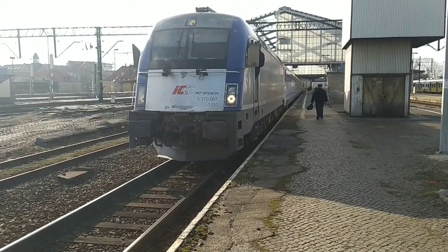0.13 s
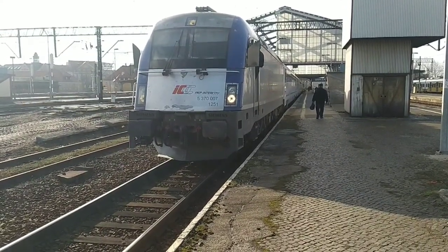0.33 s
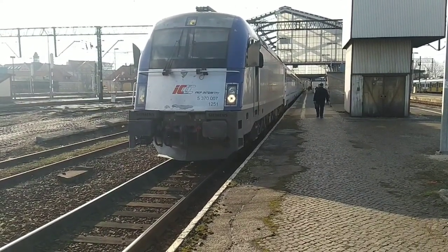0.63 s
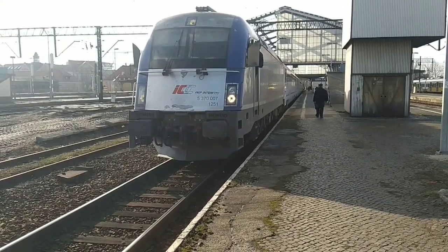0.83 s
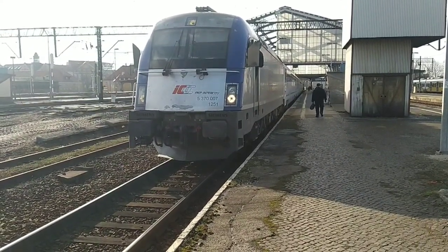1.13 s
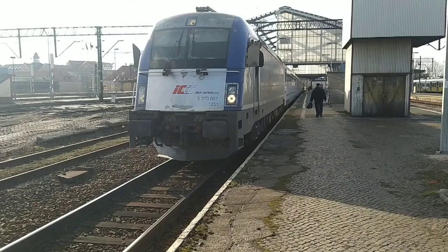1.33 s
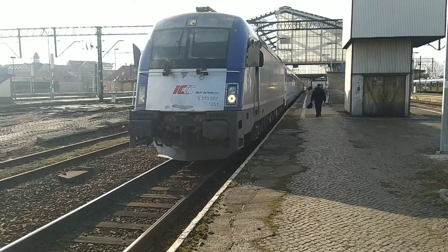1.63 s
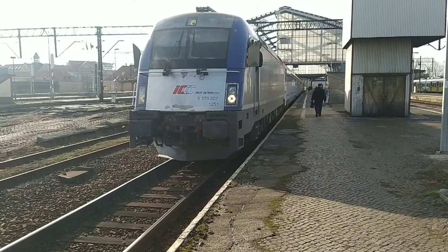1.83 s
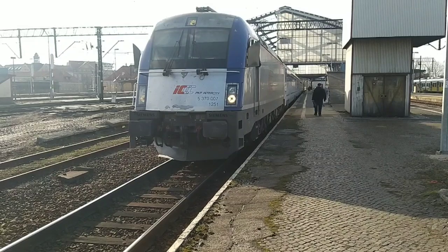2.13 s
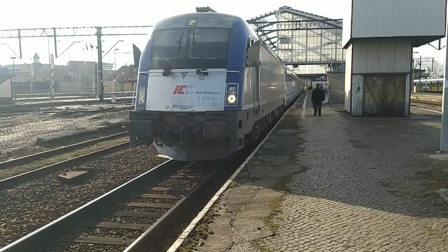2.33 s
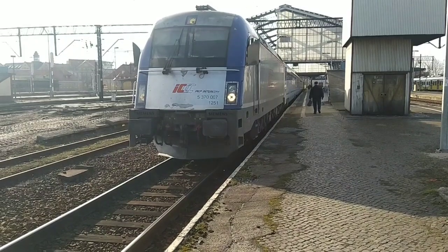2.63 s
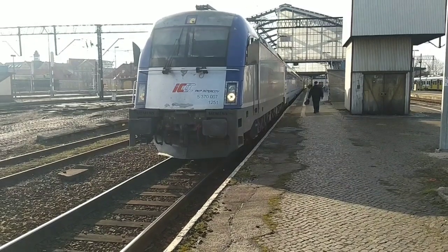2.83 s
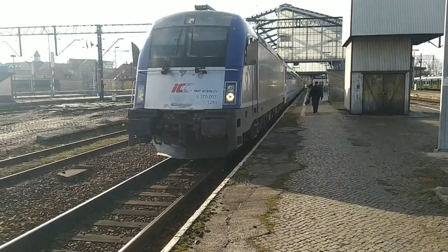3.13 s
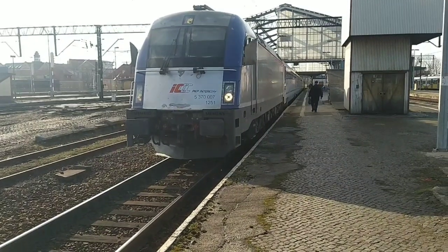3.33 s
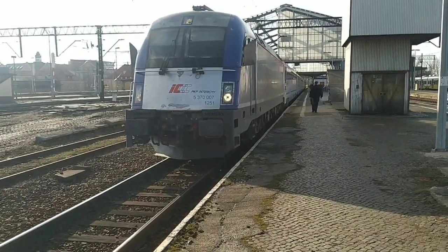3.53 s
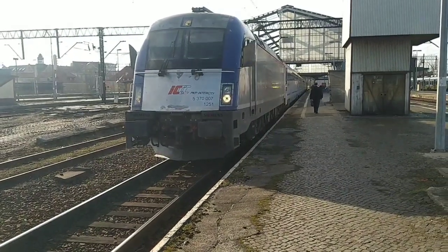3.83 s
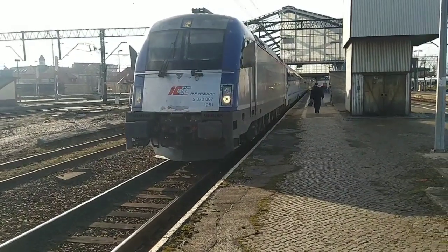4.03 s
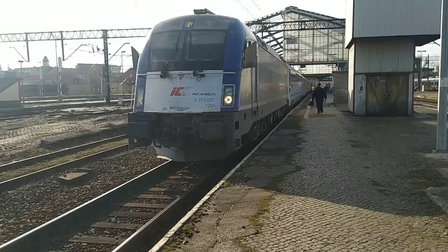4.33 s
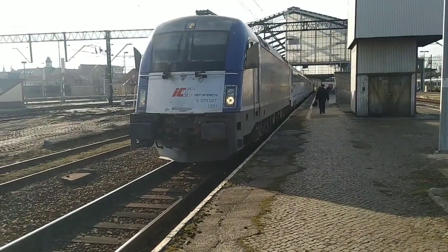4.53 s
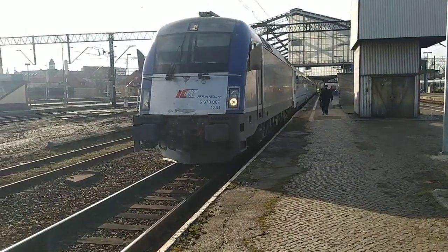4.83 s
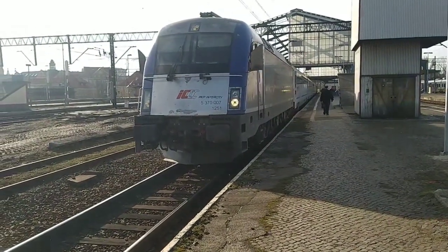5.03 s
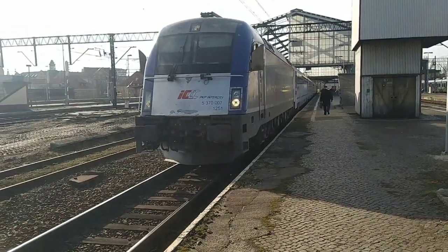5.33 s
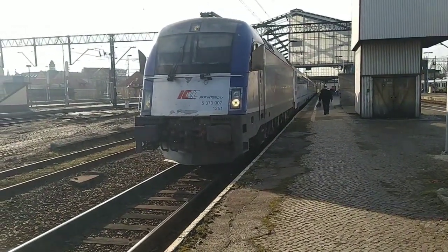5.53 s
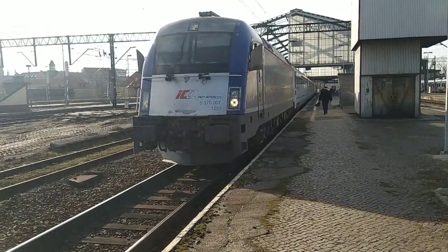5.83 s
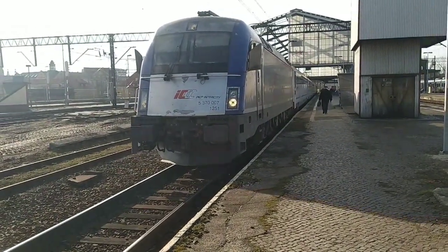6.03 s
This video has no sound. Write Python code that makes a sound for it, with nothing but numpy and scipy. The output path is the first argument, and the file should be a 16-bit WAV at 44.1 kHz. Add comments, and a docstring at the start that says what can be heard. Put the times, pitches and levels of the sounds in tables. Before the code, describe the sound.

An electric locomotive stands a few metres away at a station platform. Throughout, its cooling fan whines on one mid-pitched note, wavering gently in loudness over a hollow duct roar, rushing air and a low machinery rumble, with a faint high hiss behind. At about 1.8 seconds something rustles softly close by, and again around 3 seconds. From 3.4 seconds a faint lower fan tone comes up and the roar climbs slightly, while the whine gradually eases. Light gritty scuffs, like a shoe shifting on paving, come at about 3.6 and 4.6 seconds, with more rustling up to 5 seconds. Just after 5 seconds there is one small, bright, close snap, like grit cracking. The whine lifts barely in pitch near the end, and the machinery is still running at about 6 seconds.

```python
"""An electric locomotive stands at a platform a few metres away, about to pull out.
From the start its twelve-blade cooling fan whines on one note over duct roar, rushing air and rumble.
From 1.8 s something rustles close by, later with scuffs, like a shoe shifting on gritty paving.
At 3.4 s the machinery takes up load: a lower fan tone comes up and the duct roar climbs.
Just after 5 s comes one close snap, like grit cracking; at the end the whine lifts very slightly."""
import sys
import numpy as np
from scipy import signal
from scipy.fft import rfft, irfft
from scipy.io import wavfile

SR = 44100
rng = np.random.default_rng(int(sys.argv[2]) if len(sys.argv) > 2 else 0)


def generate_wav(signal):
    """Clip the signal to [-1, 1] and save it as 16-bit WAV at the path in sys.argv[1]."""
    frames = np.transpose(np.atleast_2d(signal))
    scaled = np.clip(frames, -1, 1) * 32767
    pcm = np.round(scaled).astype(np.int16)
    wavfile.write(sys.argv[1], SR, pcm)


N = 272538
TIME, FREQ = np.arange(N) / SR, np.fft.rfftfreq(N, 1 / SR)


# the whine's swell at the listener: (time [s], level before trim [dB], left minus right [dB])
WHINE_SWELL = [(0, -28.5, 0), (.22, -26.5, .5), (.36, -28.5, -0.5), (.7, -27.5, -1), (.93, -29.5, -3),
               (1.22, -28, 0), (1.4, -26, 1), (1.58, -29, -1), (1.78, -26.5, -.5), (1.87, -26, 2),
               (2.12, -25.5, 1), (2.22, -27, 0), (2.35, -26.5, 2), (2.62, -27.3, 2), (3.03, -25, 2),
               (3.4, -28, 6.5), (3.6, -24, 1.5), (3.74, -25.5, 0.5), (3.84, -26.5, 1.5), (3.89, -30, 0),
               (3.95, -25.5, 0), (4.07, -25.5, -2.5), (4.2, -27.5, -5), (4.3, -26, -1.5), (4.6, -28.5, -7),
               (4.84, -30.5, -10), (4.96, -29.5, -5.5), (5.07, -32, -2), (5.21, -28.5, 0),
               (5.38, -32.5, -7), (5.48, -29.5, -3.5), (5.56, -31.5, -7), (5.73, -31, -2), (5.8, -32, -3),
               (6.0, -33, 1), (6.1, -30, 7), (6.18, -32, 6)]
# its stereo image sways, then drifts toward the centre as the microphone turns:
# (time [s], right channel's phase lead [rad])
WHINE_LEAD = [(0, 1.14), (.38, .72), (.75, 1.1), (1.05, 0.63), (1.38, 1.2), (1.6, .55), (1.8, 1.05),
              (2.1, 0.79), (3.0, 0.92), (3.17, 0.85), (3.42, 1.03), (3.95, 0.52), (4.1, 0.53), (4.95, -0.1),
              (5.85, -.1), (6.0, -0.41), (6.18, 0.038)]

def blade_whine(phase, trim_db=1.94, scatter_db=-45, scatter_hz=18):
    """The blade-passing note: a wavering direct tone over its echo, scattered by the station."""
    swell_db, pan_db = curves(WHINE_SWELL)
    gain = undb(swell_db + trim_db + 0.3 * walk(12))
    direct = fan_tone(phase, rough=0.083, flutter_hz=16, lead=curves(WHINE_LEAD)[0])
    scatter = [walk(scatter_hz) * np.cos(phase) + walk(scatter_hz) * np.sin(phase) for _ in range(2)]
    return direct * gain * pan(pan_db) + undb(scatter_db) * np.array(scatter)


# the whine's pitch holds, then lifts a touch: (time [s], offset [Hz])
WHINE_BEND = [(0, .2), (2.1, .2), (2.5, 0), (5.55, 0), (5.8, .9)]
# weaker fan tones: (multiple of the shaft rate, level [dB], left minus right [dB])
SIDE_TONES = [(10, -58.5, 9), (11, -49, -8.5), (13, -45, 11.5), (24, -55, 1), (48, -59.5, 7)]

def cooling_fan(shaft_hz=58.955, blades=12, load_start_s=3.4, load_rise_s=0.28):
    """The blade whine leads; unequal blades add tones at other multiples of the shaft rate."""
    speed_hz = shaft_hz * (1 + 0.00015 * walk(1.64)) + curves(WHINE_BEND)[0] / blades
    shaft = 2 * np.pi * np.cumsum(speed_hz) / SR
    tones = blade_whine(blades * shaft)
    # the ninth multiple comes up under load
    ninth_db = np.interp(TIME, [load_start_s, load_start_s + load_rise_s], [-52, -45])
    tones += fan_tone(9 * shaft, rough=0.46, flutter_hz=7, lead=0.22) * undb(ninth_db)
    # nearly in quadrature with the whine, the side tones sway its phase more than its level
    for order, db, pan_db in SIDE_TONES:
        side = fan_tone(order * shaft + 1.4, rough=0.22, flutter_hz=7, lead=0.7)
        tones += side * undb(db) * pan(pan_db)
    return tones


def fan_tone(phase, rough, flutter_hz, lead):
    """A stereo tone, the right side lead radians ahead; intake eddies shake its level and phase."""
    def eddy():
        return walk(flutter_hz) + 1j * walk(flutter_hz)
    shared = eddy()
    flutter = np.array([unit(shared + 0.26 * eddy()) for _ in range(2)])
    carrier = np.exp(1j * (phase + lead * np.array([[0], [1]])))
    return unit(np.real((1 + rough * flutter) * carrier))


# the duct's resonant hump: (frequency [Hz], relative level [dB])
DUCT_COLOUR = [(560, -16.5), (660, -10.5), (750, -8.5), (810, -4.5), (870, -4), (925, -9.5), (1010, -20),
               (1200, -50)]
# the roar hovers, then climbs as the machinery takes up load: (time [s], level [dB])
DUCT_SWELL = [(0, -38), (.9, -36.5), (1.3, -37.5), (1.9, -36.3), (2.45, -37.5), (2.95, -37), (3.6, -37),
              (4.2, -35.5), (4.7, -34.5), (5.2, -35), (6.18, -34)]

def duct_roar():
    """Turbulence rings the duct just above the whine."""
    roar = noise(DUCT_COLOUR, coherence=0.93, lag_ms=0.042, pan_db=6.0)
    return roar * undb(curves(DUCT_SWELL)[0] + 0.5 * walk(7.9))


# a broad wash of air, full in the mids: (frequency [Hz], relative level [dB])
AIR_COLOUR = [(200, -12), (340, 6), (480, 5.5), (620, 4.5), (800, 5), (1080, 1), (1400, 3.5), (1900, -1.5),
              (2130, 0.5), (2600, -1.5), (2870, -2), (3150, -6), (4300, -10.5), (5400, -15), (6800, -18),
              (11000, -39)]
# its stereo image, wider in the treble: (frequency [Hz], coherence [0-1], left minus right [dB])
AIR_IMAGE = [(327, 1, 6.5), (580, 0.92, -3.5), (1015, 0.81, 9), (1360, 0.3, 3), (1850, 0.28, 4.5),
             (2160, 0.27, 5.5), (2230, 0.25, 0.5), (2730, 0.36, 5), (3540, 0.04, 4), (4280, 0.13, -2.5),
             (8000, 0, 7)]

def rushing_air(level_db=-34.5):
    """Turbulent cooling air rushes out through the grilles."""
    coherence, pan_db = spectra(AIR_IMAGE)
    rush = noise(AIR_COLOUR, coherence, lag_ms=0.48, pan_db=pan_db)
    return rush * undb(level_db + 0.8 * walk(8.5))


# the low bed: (frequency [Hz], relative level [dB])
RUMBLE_COLOUR = [(12, 1), (24, -2), (42, 2), (51, 1.5), (60, 3), (75, 0.5), (92, -2.5), (114, -7),
                 (142, -2.5), (155, 1), (167, -1), (186, 4.5), (215, -4), (245, -3), (295, -3.5),
                 (350, -12.5), (480, -29)]
# its slow rise and fall: (time [s], gain [dB])
RUMBLE_SWELL = [(0, -1), (0.5, 1), (1.1, -1), (1.45, 0), (1.9, -1), (2.2, 0), (2.7, -1.5), (3.15, -2),
                (3.35, 1.8), (3.75, 0.5), (4.15, -1), (5.1, 1.5), (5.5, 0), (6.18, -0.5)]

def machinery_rumble(level_db=-33.5):
    """The machine room rumbles, with a deep bottom and a boomy body resonance."""
    rumble = noise(RUMBLE_COLOUR, coherence=0.95, lag_ms=0.26, pan_db=4.5)
    return rumble * undb(level_db + curves(RUMBLE_SWELL)[0])


# the snap's bright ping: (frequency [Hz], level before the envelope [dB])
SNAP_MODES = [(8700, -29), (8930, -24), (9420, -27)]
# the grit crumbles, then settles: (start [s], level [dB], rise [s], decay time constant [s])
CRUMBLES = [(5.139, -30.5, .0012, .0075), (5.166, -41, .005, .016)]
# the brittle crunch: (frequency [Hz], relative level [dB])
CRUMBLE_COLOUR = [(2000, -8), (2900, 5), (3800, -18), (5000, 2.5), (6000, 2), (6500, 0), (6950, 5),
                  (7700, -8), (8700, 2), (9600, 2), (10600, -4), (11400, -13), (13200, -8)]

def snap(start_s=5.1368, rise_s=0.0007, decay_s=0.0043):
    """One close snap, like grit cracking: a brief high ring, then a rattling burst as it crumbles."""
    age = np.maximum(TIME - start_s, 0)
    modes = sum(undb(db) * np.sin(2 * np.pi * hz * age) for hz, db in SNAP_MODES)
    ring = modes * (1 - np.exp(-age / rise_s)) * np.exp(-age / decay_s)
    crumble = noise(CRUMBLE_COLOUR, coherence=0.63) * grain(depth_db=0.5, rate_hz=700)
    return (ring + crumble * bursts(CRUMBLES)) * pan(-2.7)


# soft strokes: (start [s], level [dB], rise [s], decay time constant [s])
RUSTLES = [(1.805, -38, 0.017, .028), (1.85, -38.5, 0.03, 0.055), (2.82, -44, 0.15, .45),
           (3.1, -38.5, .17, 0.18), (3.6, -48, 0.037, 0.066), (4.58, -44, 0.18, .13),
           (4.93, -39.5, 0.039, 0.09), (5.14, -36, 0.008, 0.023), (5.166, -41, .006, 0.031)]
# their papery upper mids: (frequency [Hz], relative level [dB])
RUSTLE_COLOUR = [(700, -26), (1400, 9.5), (2900, 7), (4400, 2), (5700, -5), (7000, -1), (9000, 2),
                 (11000, -15), (13500, -27)]

def rustles():
    """Soft rubbing close by, grainy as the surfaces catch and slip."""
    friction = noise(RUSTLE_COLOUR, coherence=0.77, pan_db=4.0)
    return friction * grain(depth_db=1.6, rate_hz=250) * bursts(RUSTLES)


# gritty strokes: (start [s], level [dB], rise [s], decay time constant [s])
SCUFFS = [(3.558, -39, 0.029, .05), (3.61, -42, 0.023, 0.062), (4.6, -48.5, 0.024, .2),
          (5.166, -49, 0.011, 0.065)]
# their thin, peaky top: (frequency [Hz], relative level [dB])
SCUFF_COLOUR = [(3000, -24), (4300, 4), (5200, -14), (6800, -10), (7700, 4), (8450, 3), (8670, 14),
                (8850, 6), (9050, 6), (9350, 0), (9580, 2), (9740, 9), (9950, -3), (10400, -10),
                (13000, -30)]

def scuffs():
    """Bright scrapes close by, with a faster, harder catch and slip."""
    friction = noise(SCUFF_COLOUR, coherence=0.83, pan_db=-2.0)
    return friction * grain(depth_db=2.4, rate_hz=900) * bursts(SCUFFS)


def undb(db):
    """Decibels to gain."""
    return 10 ** (np.asarray(db) / 20)


def unit(x):
    """Scale to rms 1."""
    return x / np.sqrt(np.mean(np.abs(x) ** 2))


def curves(table):
    """A table's columns as straight ramps over time."""
    times, *columns = np.transpose(table)
    return [np.interp(TIME, times, column) for column in columns]


def spectra(table):
    """A table's columns as straight ramps over log frequency."""
    hz, *columns = np.transpose(table)
    return [np.interp(np.log(FREQ + 1), np.log(hz), column) for column in columns]


def pan(db):
    """Stereo gains that put the left channel db above the right."""
    return undb(np.array([np.atleast_1d(db), -np.atleast_1d(db)]) / 2)


def walk(rate_hz):
    """A smooth random wobble of rms 1, rolling off above rate_hz."""
    return unit(irfft(rfft(rng.standard_normal(N)) * np.exp(-(FREQ / rate_hz) ** 2), N))


def grain(depth_db, rate_hz):
    """A fast random gain that roughens a texture."""
    return unit(undb(depth_db * walk(rate_hz)))


def noise(colour, coherence, lag_ms=0, pan_db=0):
    """Coloured stereo noise: a direct part that reaches the left lag_ms late, plus a diffuse part."""
    direct, *diffuse = rfft(rng.standard_normal((3, N)))
    share = np.clip(coherence, 0, 1)
    delay = np.exp(-2j * np.pi * FREQ * lag_ms / 1000)
    stereo = np.sqrt(share) * np.array([direct * delay, direct]) + np.sqrt(1 - share) * np.array(diffuse)
    # steep roll-off beyond the colour's first and last points
    skirts = np.minimum(1, np.minimum(FREQ / colour[0][0], colour[-1][0] / (FREQ + 1))) ** 4
    return unit(irfft(stereo * undb(spectra(colour)[0]) * skirts * pan(pan_db), N))


def bursts(table):
    """Envelope of hits that ramp up and die away, summed in power."""
    power = np.zeros(N)
    for start, db, rise, decay in table:
        age = TIME - start
        attack = np.clip(age / rise, 0, 1)
        tail = np.exp(-np.maximum(age - rise, 0) / decay)
        power += (undb(db) * attack * tail) ** 2
    return np.sqrt(power)


def scene():
    """The locomotive, with the small close noises on top."""
    locomotive = cooling_fan() + duct_roar() + rushing_air() + machinery_rumble()
    return locomotive + rustles() + scuffs() + snap()


# the bright noise floor: (frequency [Hz], relative level [dB])
HISS_COLOUR = [(4000, -19), (6200, -7.5), (7400, -1), (8900, 2.5), (9500, -0.5), (10200, -8), (11300, -15),
               (13500, -32)]

def record(dry, hiss_db=-47, cutoff_hz=13600):
    """The microphone adds an even hiss, a little to the right, and cuts the top."""
    hiss = noise(HISS_COLOUR, coherence=0.9, pan_db=-4.0) * undb(hiss_db + walk(35))
    lowpass = signal.ellip(8, 0.2, 70, cutoff_hz, fs=SR, output="sos")
    return signal.sosfilt(lowpass, dry + hiss)


dry = scene()
out = record(dry)
generate_wav(out)
```